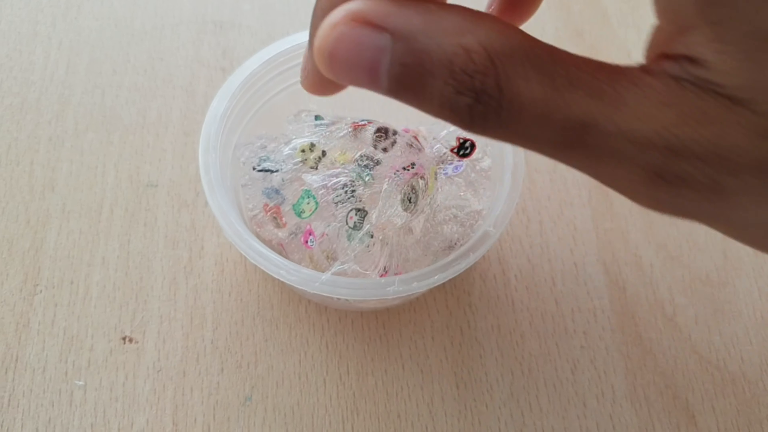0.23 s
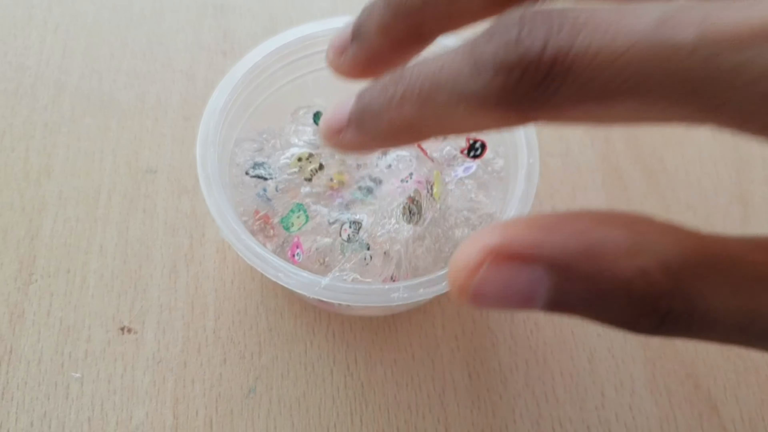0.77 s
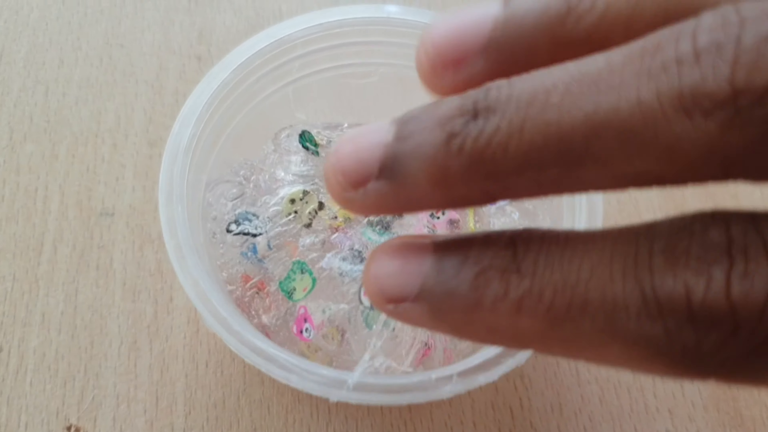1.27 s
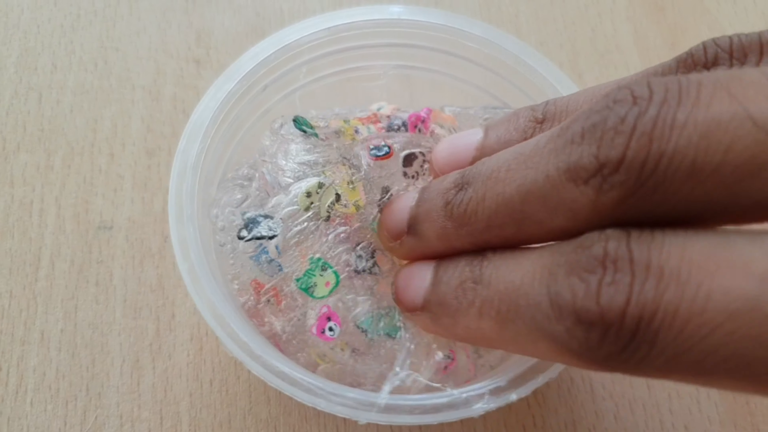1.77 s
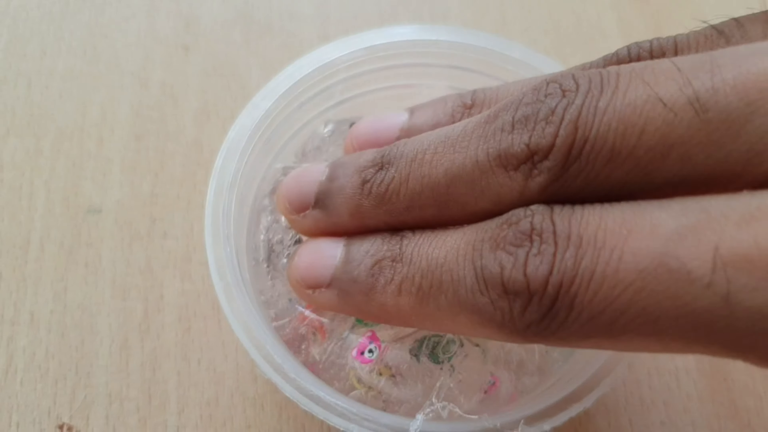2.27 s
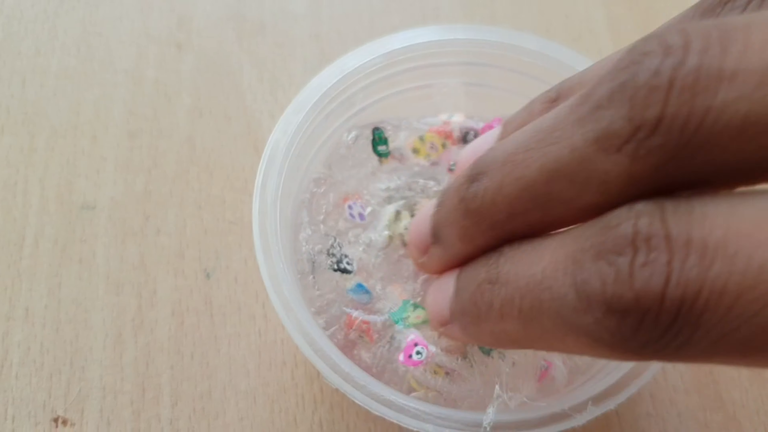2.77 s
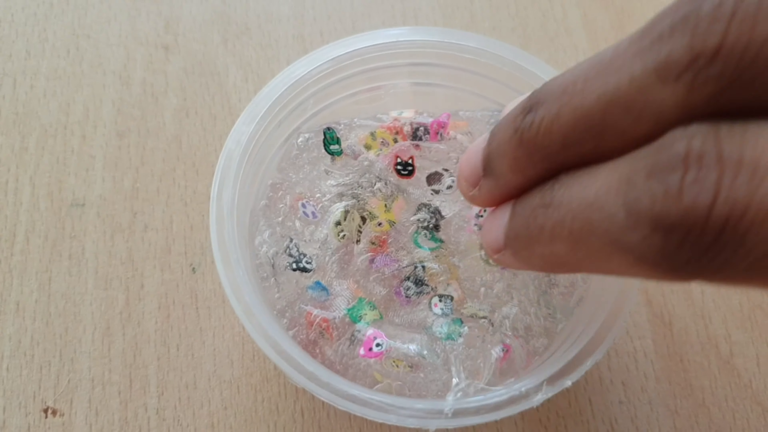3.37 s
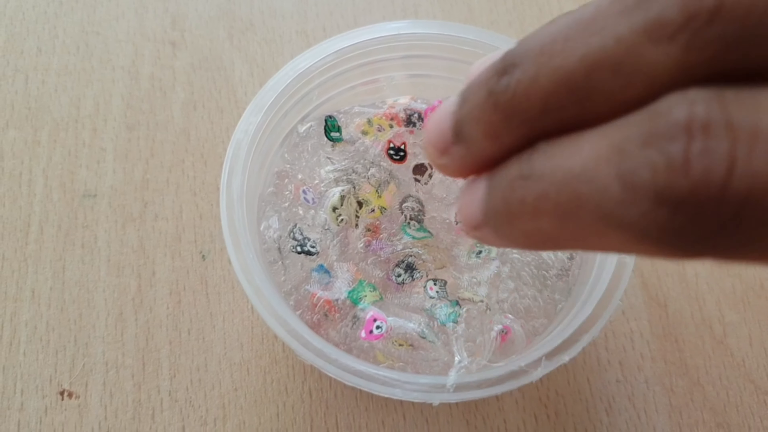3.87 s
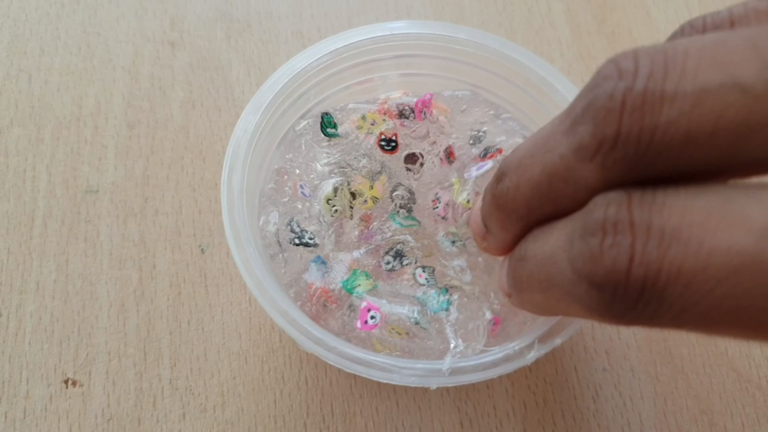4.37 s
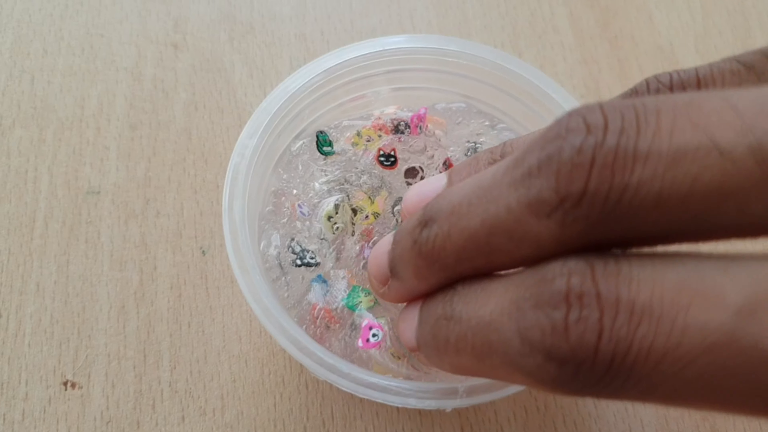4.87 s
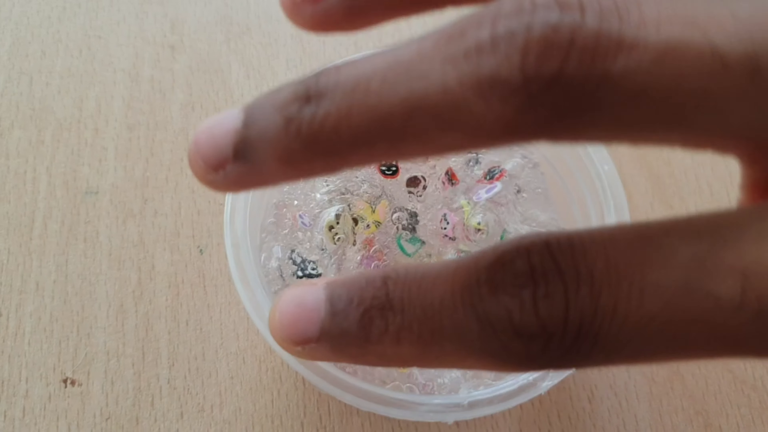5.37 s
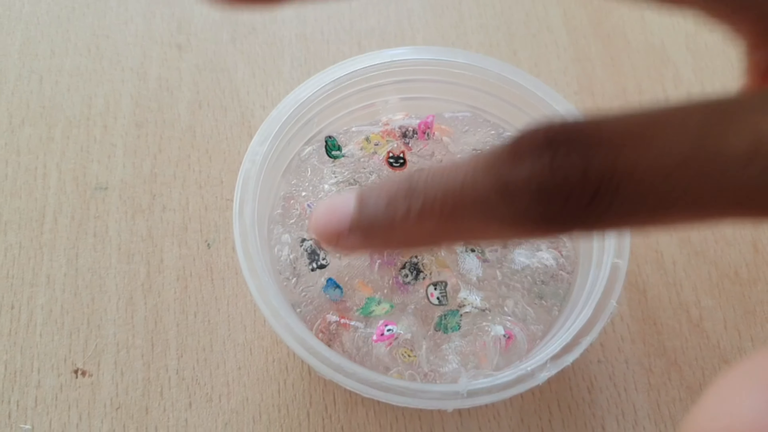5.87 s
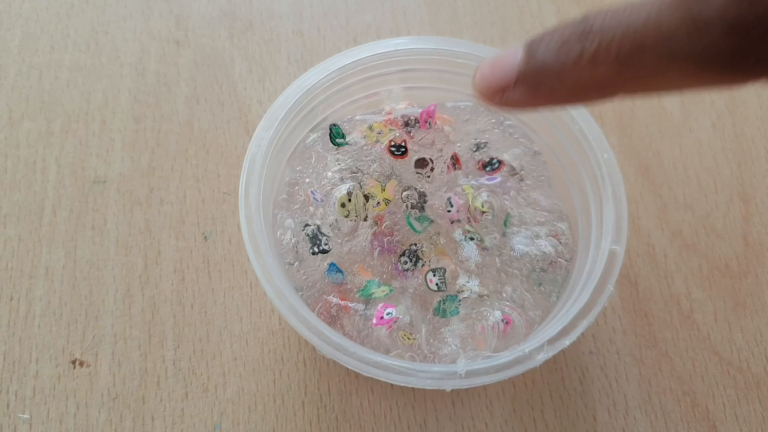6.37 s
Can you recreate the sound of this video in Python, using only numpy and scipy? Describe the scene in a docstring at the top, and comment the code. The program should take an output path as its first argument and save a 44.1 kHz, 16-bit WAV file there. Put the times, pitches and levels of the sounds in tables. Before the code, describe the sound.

Slime is pressed and peeled in a thin plastic container. Short, soft crackles alternate with near silence and small high ticks. One taut bubble snaps very sharply, two trapped air pockets pop loudly and knock the tub and table, and a later hard squeeze gives a run of wet bubbles with a dull thump. The close microphone hears it mostly from the left, with dry reflections, faint hiss and low rumble.

```python
"""On a wooden table in a small dry room, fingers press and pull slime in a plastic tub, left of a microphone.
Peeling skin crackles as dense random grains, which a hollow under the finger filters to sound wet.
Small bubbles tick as rising rings with a crack; a taut one snaps, and a short bright hiss dies away after it.
Trapped air pockets pop as single pulses that ring the tub's wall and thump tub and table as damped modes.
Decaying noise serves as the room's reflections; filtered noise gives a low rumble and a faint hiss."""
import sys
import numpy as np
from scipy import signal
from scipy.fft import rfft, irfft, next_fast_len
from scipy.io import wavfile
from scipy.ndimage import uniform_filter1d, minimum_filter1d

SR = 44100
rng = np.random.default_rng(int(sys.argv[2]) if len(sys.argv) > 2 else 0)


def digitize_waveform(pressure):
    """Quantize a signal to 16-bit integers and store it at the path in sys.argv[1].

    Rows of a 2-D input are taken as channels; values are limited to [-1, 1].
    """
    field = np.atleast_2d(pressure).T
    bounded = np.clip(field, -1, 1)
    quanta = np.round(bounded * 32767).astype(np.int16)
    wavfile.write(sys.argv[1], SR, quanta)


N = 291929
TIME = np.arange(N) / SR

# Finger strokes. Each row: peak time in seconds, rise in seconds, fall in seconds,
# level in dB before filtering, wetness from 0 to 1.
FINGER_STROKES = [(0.075, 0.021, 0.077, -52, 0.76), (0.515, 0.0068, .011, -53.5, .4),
                  (0.676, 0.054, 0.098, -53.5, 0.64), (0.753, 0.017, 0.033, -52.5, 0.21),
                  (1.178, 0.033, 0.027, -57.5, 0.43), (1.292, 0.066, 0.011, -51.5, 0.83),
                  (1.61, 0.071, 0.041, -61.5, 0.25), (1.978, .085, .04, -54, .88),
                  (2.571, 0.041, 0.043, -53, 0.87), (2.666, 0.033, 0.065, -59.5, 0.94),
                  (3.02, 0.044, 0.036, -59.5, 0.64), (3.123, .022, .016, -62, 0),
                  (3.669, 0.062, 0.074, -73.5, 0.27), (3.867, 0.027, 0.028, -59, 0.09),
                  (4.272, 0.15, .1, -64.5, 0.32), (4.473, .007, 0.019, -61, 1),
                  (4.537, 0.045, 0.014, -57.5, 0.74), (4.588, 0.035, 0.0049, -51, 0.18),
                  (4.636, 0.032, 0.015, -42.5, 1), (5.079, 0.041, 0.028, -69, 0.17),
                  (5.205, 0.097, 0.04, -57.5, 0.21), (5.437, 0.0035, 0.017, -55, 1),
                  (5.94, 0.044, 0.019, -65.5, 0), (6.22, 0.026, 0.026, -59, 0.17),
                  (6.319, 0.084, 0.18, -64.5, 0.31)]
# Spectrum of the peeling skin. Each row: frequency in Hz, level in dB.
PEEL_SPECTRUM = [(900, -37.5), (2000, -4), (3300, 1), (5000, -5), (7400, -2), (9000, -14.5), (13000, -28)]
# Resonance of the hollow under the finger. Each row: frequency in Hz before the pitch ratio, level in dB.
HOLLOW_SPECTRUM = [(300, -23.5), (560, -10.5), (820, 1.5), (1080, -4.5), (1450, 5), (2200, -3), (4000, -26)]
# A hard press opens a deeper hollow. Each row: stroke level in dB, pitch ratio.
HOLLOW_PITCH_RATIOS = [(-51, 1.06), (-32, 0.78)]
# Spectrum of the crackle's treble. Each row: frequency in Hz, level in dB.
TREBLE_SPECTRUM = [(6000, -23.5), (9500, 4), (12000, 0.5), (15500, -12)]
# Bursting air pockets. Each row: start in seconds, pulse peak in dB, brightness in dB per octave,
# thump in dB, thump bandwidth in Hz.
POCKET_BURSTS = [(2.0310, -4, 0.5, -33, 600), (2.7110, 2, 1.3, -26.5, 800), (3.7414, -23.5, 6, -48.5, 800),
                 (3.8790, -36.5, 6, -60, 600), (4.6120, -13, 5.5, -25, 95), (4.6463, -16.5, -0.5, -37, 104),
                 (4.661, -26, 7.5, -28.5, 84)]
# Spectrum of a bursting pocket. Each row: frequency in Hz, level in dB before the brightness tilt.
BURST_SPECTRUM = [(60, -40.5), (250, -25.5), (480, -11.5), (600, -13.5), (850, 0.5), (1200, -3.5),
                  (1600, -1), (2100, -7), (2850, 1.5), (3700, -11), (4800, -11), (6300, -21), (8000, -26.5),
                  (10000, -36.5), (15500, -40)]
# Modes of the tub's thin wall. Each row: frequency in Hz, level in dB re the pulse, t60 in seconds.
TUB_WALL_MODES = [(845, -17.5, 0.068), (1388, -28, 0.1), (1533, -32, 0.098), (1610, -35, 0.05),
                  (1673, -33, 0.082), (2050, -33.5, .1), (2480, -30.5, 0.051), (2644, -32.5, 0.045),
                  (3400, -39.5, .08)]
# Modes of tub and table top. Each row: frequency in Hz, level in dB re the push, t60 in seconds.
TUB_AND_TABLE_MODES = [(95, -8.5, 0.3), (148, -20.5, 0.36), (200.2, -17.5, 0.48), (308, -3.5, 0.22),
                       (448.6, 3.5, 0.18), (528, -12.5, 0.27), (591.5, 2.5, 0.16), (760, -9, 0.082),
                       (973, -12, 0.15)]
# Single small bubbles. Each row: crest time in seconds, ring in dB, ring pitch in Hz, crack in dB.
SINGLE_BUBBLES = [(0.214, -46, 4970, -39.5), (0.513, -43.5, 3600, -39.5), (0.5642, -44, 2580, -50),
                  (1.794, -38.5, 7200, -39), (1.999, -37, 5700, -40), (2.014, -34, 3580, -64),
                  (2.295, -42.5, 2385, -58), (2.666, -32.5, 7000, -31.5), (2.963, -47, 2430, -63),
                  (3.8572, -37, 7230, -56), (4.523, -41, 1600, -40), (4.5364, -36, 3460, -53),
                  (4.5682, -29, 3770, -41), (4.5792, -29.5, 3970, -47), (5.119, -35, 7600, -48),
                  (5.125, -39, 7380, -42), (5.195, -45, 2210, -26), (5.2194, -62, 2830, -31),
                  (5.2365, -37, 1470, -29.5), (5.635, -43.5, 2398, -42.5), (6.377, -38.5, 6280, -43)]
# Spectrum of a bubble's cracking skin. Each row: frequency in Hz, level in dB.
CRACK_SPECTRUM = [(200, -42), (1300, -28), (2100, -11), (2900, 0), (4200, -1), (4900, -10), (6800, -2),
                  (9500, -8.5), (12000, -1.5), (15500, -10)]
# Runs of bubbles. Each row: start in seconds, length in seconds, bubbles per second,
# ring in dB, ring pitch in Hz before scatter.
BUBBLE_RUNS = [(4.610, 0.006, 1100, -22.5, 2695), (4.621, 0.043, 200, -28, 1890)]
# Rings of the snapping bubble. Each row: frequency in Hz, level in dB re the snap, cycles to the crest.
SNAP_RING_MODES = [(2950, -11, 2), (7010, -0.5, 2.2), (14200, -9.5, 5)]
# Spectrum of the bright hiss that dies away after the snap. Each row: frequency in Hz, level in dB.
SNAP_HISS_SPECTRUM = [(400, -12.5), (1200, -5), (2700, 0), (5000, -4), (7000, -11.5), (10000, -3.5),
                      (15000, -0.5)]
# Shading of the right side by the microphone's body. Each row: frequency in Hz, gain in dB.
SHADE_SPECTRUM = [(200, -2.5), (800, -19.5), (1600, -6), (3000, -43), (7000, -22.5), (15000, -10.5)]
# Rumble of the background. Each row: frequency in Hz, density in dB per Hz before the level curve.
RUMBLE_SPECTRUM = [(20, -92), (45, -98.5), (65, -81), (100, -85), (160, -91), (260, -105), (500, -113),
                   (1500, -130)]
# Hiss on each side. Each row: frequency in Hz, density in dB per Hz before the level curve.
HISS_SPECTRUM = [(40, -96.5), (100, -91), (200, -103), (400, -110), (1100, -114), (2400, -112),
                 (4000, -115), (8000, -117), (15500, -117.5)]
# Extra hiss on the left. Each row: frequency in Hz, density in dB per Hz before the level curve.
LEFT_HISS_SPECTRUM = [(450, -120), (780, -100), (1100, -110), (1600, -95), (1880, -102), (2200, -87),
                      (2620, -88.5), (3200, -107), (5000, -116), (9000, -130)]
# Background level, which sinks for a while. Each row: time in seconds, level in dB (only differences count).
BACKGROUND_LEVEL = [(0.0, -65.5), (0.33, -65.5), (0.79, -63.5), (2.7, -68), (3.25, -74.5), (3.8, -73.5),
                    (4.12, -66.5), (4.56, -66), (6.6, -65.5)]

DRY_BODY_DB, WET_BODY_DB = -14.5, 4.5  # a wet stroke rings the hollow under the finger,
DRY_TREBLE_DB, WET_TREBLE_DB = -5.5, -33  # a dry one is bright
DRY_SPREAD, WET_SPREAD = 0.41, 0.07  # and its grains differ more in size (log units)
TUB_DB = -23.5  # the crackle faintly rings tub and table
SWELL_CYCLES, SWELL_HZ = 2.8, 3470  # a bubble of this pitch crests after so many cycles; higher ones take more
CRACK_DB = -7  # crack against ring, for bubbles in runs and under strokes
STRAY_PER_S, STRAY_DB, STRAY_HZ = 200, 5.5, 1505  # rate at full wetness, ring re the stroke, pitch before scatter
SNAP_S, SNAP_DB, SNAP_CRACK_DB = 1.6467, -3, 0  # the crack is relative to the snap
SNAP_HISS_DB, SNAP_HISS_T60_S = -39, 0.23
ROOM_T60_S, ROOM_TREBLE_T60_S, ROOM_DELAY_S = 0.15, 0.14, 0.007
EARLY_DB, EARLY_T60_S = 4, 0.016  # early scatter, re the tail
FLOOR_DB = -0.2  # the background at its loudest, against its spectra
TOP_HZ = 15800


def amp(db):
    """Level law: decibels to amplitude gain."""
    return 10 ** (np.asarray(db) / 20)


def curve(points, freq):
    """Frequency response: gain interpolated in dB over log frequency."""
    hz, db = np.transpose(points)
    return amp(np.interp(np.log(freq + 1), np.log(hz), db))


def colour(x, points, keep_power=False):
    """Linear filtering: a product of spectra; optionally white input keeps its power."""
    size = next_fast_len(N, True)
    gain = curve(points, np.fft.rfftfreq(size, 1 / SR))
    if keep_power:
        gain = gain / np.sqrt(np.mean(gain ** 2))
    return irfft(rfft(x, size) * gain, size)[:N]


def click(points, size=512):
    """Minimum phase: the shortest causal pulse with the given spectrum, peak 1."""
    cepstrum = irfft(np.log(curve(points, np.fft.rfftfreq(size, 1 / SR))))
    # fold the cepstrum onto positive time
    cepstrum[1:size // 2] *= 2
    cepstrum[size // 2 + 1:] = 0
    pulse = irfft(np.exp(rfft(cepstrum)))
    return pulse / np.abs(pulse).max()


def fade(t, t60):
    """Exponential damping: 60 dB down at t60."""
    return np.exp(-np.log(1000) * t / t60)


def add(track, s, sound):
    """Superposition: a sound joins a track from time s on."""
    i = int(round(s * SR))
    track[i:i + len(sound)] += sound[:N - i]


def crackle(grains_per_s=8000, flutter_db=3.0, edge=1.3):
    """Stick-slip and resonance: skin peels in tiny releases; the hollow under the finger makes them sound wet."""
    peel, body, treble = np.zeros((3, N))
    chance, size, flutter = rng.random(N), rng.standard_normal(N), rng.standard_normal(N)
    sign, treble_sign = rng.choice([-1, 1], (2, N))
    hold = SR // 200  # 5 ms in samples
    # random grains of unit mean power
    grains = sign * (chance < grains_per_s / SR) * np.sqrt(SR / grains_per_s)
    # the finger sticks and slips every few milliseconds
    slip = uniform_filter1d(flutter, hold) * np.sqrt(hold)
    grains = grains * amp(flutter_db * slip)
    for s, rise, fall, db, wetness in FINGER_STROKES:
        body_db = np.interp(wetness, [0, 1], [DRY_BODY_DB, WET_BODY_DB])
        treble_db = np.interp(wetness, [0, 1], [DRY_TREBLE_DB, WET_TREBLE_DB])
        spread = np.interp(wetness, [0, 1], [DRY_SPREAD, WET_SPREAD])
        near = (TIME > s - 2 * rise) & (TIME < s + 2 * fall)
        t = TIME[near] - s
        press = np.exp(-2 * np.abs(t / np.where(t < 0, rise, fall)) ** edge)
        # log-normal sizes that keep the mean power
        grain_size = np.exp(spread * size[near] - spread ** 2)
        stroke = amp(db) * press * grains[near] * grain_size
        ratio = np.interp(db, *np.transpose(HOLLOW_PITCH_RATIOS))
        hollow = click([(hz * ratio, level) for hz, level in HOLLOW_SPECTRUM])
        hollow = hollow / np.linalg.norm(hollow)
        peel[near] += stroke
        treble[near] += amp(treble_db) * stroke * treble_sign[near]
        add(body, TIME[near][0], amp(body_db) * np.convolve(stroke, hollow))
    skin = colour(peel, PEEL_SPECTRUM, True)
    bright = colour(treble, TREBLE_SPECTRUM, True)
    late_body = np.roll(body, hold)  # the hollow sounds 5 ms late
    return skin + late_body + bright + amp(TUB_DB) * tub(peel)


def tub(x):
    """Modal resonance: tub and table ring under a small push; white input keeps its power."""
    t = TIME[:SR // 2]
    ring = sum(amp(db) * fade(t, t60) * np.sin(2 * np.pi * hz * t) for hz, db, t60 in TUB_AND_TABLE_MODES)
    return signal.fftconvolve(x, ring / np.linalg.norm(ring))[:N]


def pops(swell_cycles=1.3, blur=0.39, blur_s=0.0083):
    """Impulse excitation: a burst's pressure pulse rings the tub's wall; its recoil thumps tub and table."""
    air, wood, t = np.zeros(N), np.zeros(N), TIME[:SR // 2]
    hold = int(blur_s * SR)
    wall = np.zeros(len(t))
    for hz, db, t60 in TUB_WALL_MODES:
        wall += amp(db) * fade(t, t60) * np.sin(2 * np.pi * hz * t) * (1 - np.exp(-t * hz))
    for s, db, tilt_db, thump_db, thump_hz in POCKET_BURSTS:
        tilted = [(hz, level + tilt_db * np.log2(hz)) for hz, level in BURST_SPECTRUM]
        add(air, s, amp(db) * click(tilted))
        add(air, s, amp(db) * wall)
        for hz, mode_db, t60 in TUB_AND_TABLE_MODES:
            # the pressing fingers keep changing the load, which blurs each ring
            noise = rng.standard_normal((2, len(t)))
            waver = uniform_filter1d(noise, hold, mode="wrap") * np.sqrt(hold) * blur
            ring = (1 + waver[0]) * np.sin(2 * np.pi * hz * t) + waver[1] * np.cos(2 * np.pi * hz * t)
            # a soft push leaves the higher modes quiet
            push = amp(thump_db + mode_db) / np.hypot(1, (hz / thump_hz) ** 2)
            build_up = 1 - np.exp(-t * hz / swell_cycles)
            add(wood, s, push * ring * fade(t, t60) * build_up)
    return air, wood


def ticks():
    """Bubble resonance: each small bubble swells into a short rising ring, and its skin cracks at the crest."""
    out, crack = np.zeros(N), click(CRACK_SPECTRUM)
    for s, db, hz, crack_db in SINGLE_BUBBLES + squelch() + strays():
        cycles = SWELL_CYCLES * np.sqrt(hz / SWELL_HZ)
        add(out, s - cycles / hz, amp(db) * bubble(hz, cycles))
        add(out, s, amp(crack_db) * crack)
    return out


def bubble(hz, cycles, glide=0.06):
    """Rising resonance: a ring swells to its crest in so many cycles, where its pitch passes hz."""
    t = TIME[:SR // 20]
    u = t * hz / cycles  # 1 at the crest
    swell = (u * np.exp(1 - u)) ** 3
    return swell * np.sin(2 * np.pi * hz * t * (1 + glide * (u / 2 - 1)))


def squelch(scatter_db=0.0, scatter_octaves=0.41):
    """Escape of squeezed air: an uneven run of bubbles, as rows of (s, ring dB, ring Hz, crack dB)."""
    rows = []
    for s, length, per_s, db, hz in BUBBLE_RUNS:
        chance = rng.standard_normal(size=(64, 3))
        for k, (late, loud, high) in enumerate(chance[:int(length * per_s)]):
            when = s + (k + (1 + np.tanh(late)) / 2) / per_s
            ring_db = db + scatter_db * loud
            rows.append((when, ring_db, hz * 2 ** (scatter_octaves * high), ring_db + CRACK_DB))
    return rows


def strays(scatter_db=2.5, scatter_octaves=0.55):
    """Random rupture: a wet stroke breaks tiny bubbles, as rows of (s, ring dB, ring Hz, crack dB)."""
    rows = []
    for s, rise, fall, db, wetness in FINGER_STROKES:
        chance = rng.standard_normal(size=(64, 3))
        for late, loud, high in chance[:int(STRAY_PER_S * wetness * (rise + fall))]:
            when = s + late / 2 * (rise if late < 0 else fall)
            ring_db = db + STRAY_DB + scatter_db * (loud - abs(late))
            rows.append((when, ring_db, STRAY_HZ * 2 ** (scatter_octaves * high), ring_db + CRACK_DB))
    return rows


def snap():
    """Release of tension: a taut bubble gives a hard crack and a few high rings; a short bright hiss dies away
    after it."""
    out, hiss, t = np.zeros(N), np.zeros(N), TIME[:SR // 4]
    add(out, SNAP_S, amp(SNAP_DB + SNAP_CRACK_DB) * click(CRACK_SPECTRUM))
    for hz, db, cycles in SNAP_RING_MODES:
        add(out, SNAP_S - cycles / hz, amp(SNAP_DB + db) * bubble(hz, cycles))
    add(hiss, SNAP_S, amp(SNAP_HISS_DB) * fade(t, SNAP_HISS_T60_S) * rng.standard_normal(len(t)))
    return out + colour(hiss, SNAP_HISS_SPECTRUM, True)


def room(x, split_hz=3000):
    """Reverberation: table top and hand scatter sound first, then the walls, where treble dies sooner."""
    t, (noise, scatter) = TIME[:SR // 2], rng.standard_normal((2, SR // 2))
    low = signal.sosfilt(signal.butter(2, split_hz, fs=SR, output="sos"), noise)
    high = signal.sosfilt(signal.butter(2, split_hz, "high", fs=SR, output="sos"), noise)
    # second-order bands meet in opposite phase, hence the minus
    tail = low * fade(t, ROOM_T60_S) - high * fade(t, ROOM_TREBLE_T60_S)
    walls = np.roll(tail, int(ROOM_DELAY_S * SR)) / np.linalg.norm(tail)
    early = scatter * fade(t, EARLY_T60_S)
    response = walls + amp(EARLY_DB) * early / np.linalg.norm(early)
    return signal.fftconvolve(x, response)[:N]


def background():
    """Filtered noise: rumble common to both sides, thin hiss on each, and extra hiss in narrow bands on the left."""
    rumble, left, right, band = rng.standard_normal((4, N)) * np.sqrt(SR / 2)  # unit power per Hz
    left_hiss = colour(left, HISS_SPECTRUM) + colour(band, LEFT_HISS_SPECTRUM)
    hiss = np.array([left_hiss, colour(right, HISS_SPECTRUM)])
    s, db = np.transpose(BACKGROUND_LEVEL)
    level = amp(FLOOR_DB + np.interp(TIME, s, db - db.max()))
    return (colour(rumble, RUMBLE_SPECTRUM) + hiss) * level


def scene(pop_room_db=-12, tick_room_db=-15, snap_room_db=-20, crackle_room_db=-7,
          right_room_db=-1, right_wood_db=-2.0, shade_share=0.16):
    """Acoustic shading: airborne sound favours the left, while the table's thump reaches both sides."""
    (air, wood), tick, crack, peel = pops(), ticks(), snap(), crackle()
    direct = air + tick + crack + peel
    lag = 6  # samples by which the right side hears later
    spill = amp(pop_room_db) * air + amp(tick_room_db) * tick
    spill = spill + amp(snap_room_db) * crack + amp(crackle_room_db) * peel
    # reflections come from all round, so the right side is only partly shaded from them
    shaded = colour(spill, [(hz, shade_share * db) for hz, db in SHADE_SPECTRUM])
    left = direct + wood + room(spill)
    right_direct = colour(direct, SHADE_SPECTRUM) + amp(right_wood_db) * wood
    right = np.roll(right_direct, lag) + amp(right_room_db) * room(shaded)
    return np.array([left, right]) + background()


def record(dry, limit_db=1.0, limiter_s=0.001):
    """Peak limiting and band limiting: the gain ducks for the highest crests; a low-pass cuts the top."""
    hold = int(limiter_s * SR) + 1
    gain = np.minimum(1, amp(limit_db) / (np.abs(dry).max(axis=0) + 1e-9))
    smooth_gain = uniform_filter1d(minimum_filter1d(gain, hold), hold)
    low_pass = signal.ellip(8, .2, 70, TOP_HZ, fs=SR, output="sos")
    return signal.sosfilt(low_pass, dry * smooth_gain)


dry = scene()
out = record(dry)
digitize_waveform(out)
```